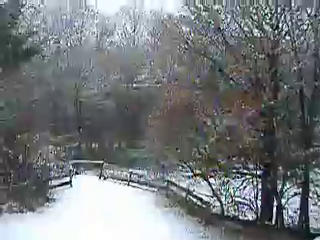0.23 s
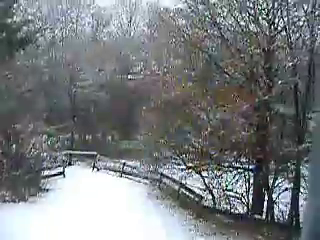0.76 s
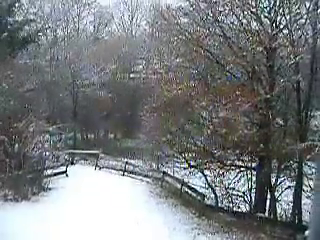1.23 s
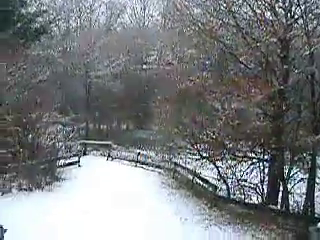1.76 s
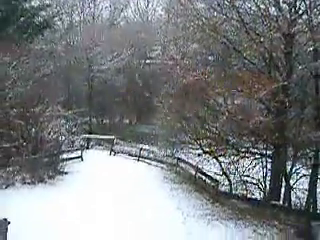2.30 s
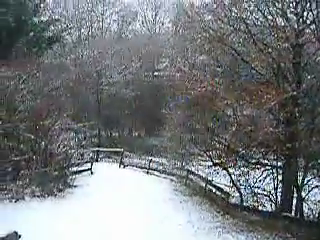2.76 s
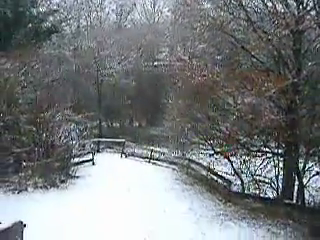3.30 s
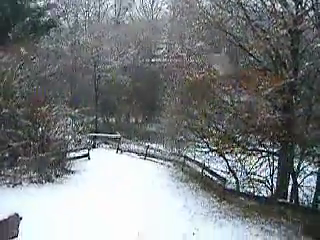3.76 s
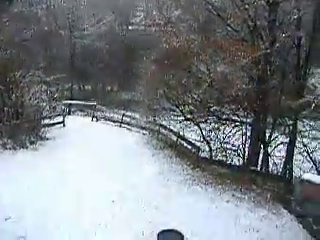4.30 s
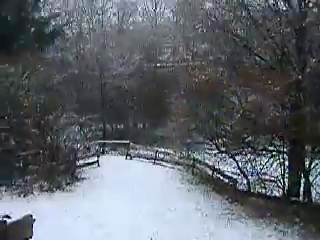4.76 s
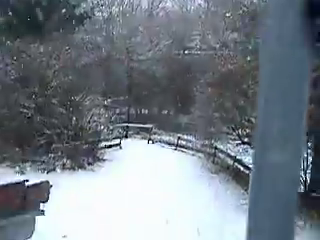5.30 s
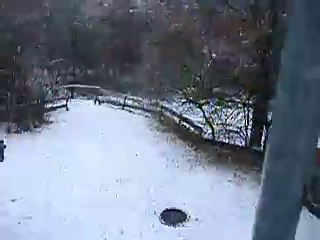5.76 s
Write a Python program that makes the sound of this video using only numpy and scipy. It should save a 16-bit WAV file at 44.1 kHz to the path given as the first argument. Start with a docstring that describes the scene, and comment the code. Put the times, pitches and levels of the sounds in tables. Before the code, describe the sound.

Hard clicks and hollow knocks of a hand on a small camera housing, some ringing metallically, over snowy outdoor hush, then dull footsteps thud on metal.

```python
"""A quiet, snowy garden with a metal spiral staircase, where someone handles a small camera.
Finger clicks and knocks excite the damped modes of the housing; rubs are stick-slip noise.
Near the end steps thud on the treads, as struck modes with grit and a boom of the frame.
Beneath lie shaped noise for the outdoor hush, a low rumble of faint wind that swells with air puffs
and step jolts, and faint steady high tones made of sines."""
import sys
import numpy as np
from scipy import signal
from scipy.fft import rfft, irfft
from scipy.io import wavfile
from scipy.ndimage import uniform_filter1d

SR = 44100
rng = np.random.default_rng(int(sys.argv[2]) if len(sys.argv) > 2 else 0)


def generate_wav(signal):
    """Clip the signal to [-1, 1] and save it as 16-bit WAV at the path in sys.argv[1]."""
    frames = np.transpose(np.atleast_2d(signal))
    scaled = np.clip(frames, -1, 1) * 32767
    pcm = np.round(scaled).astype(np.int16)
    wavfile.write(sys.argv[1], SR, pcm)


N = 266364
TIME = np.arange(N) / SR  # seconds from the start
AGE = np.arange(SR // 3) / SR  # seconds since a contact

# spectrum of the outdoor hush: (frequency [Hz], relative level [dB])
HUSH_SPECTRUM = [(20, -17.5), (45, 3), (90, -2.5), (150, -15), (220, -5.5), (350, -12.5), (520, -12),
                 (700, -11.5), (1100, -18), (1800, -19), (3000, -24), (6500, -23.5), (7900, -22.5),
                 (8400, -32)]
# spectrum of the low rumble: (frequency [Hz], relative level [dB])
RUMBLE_SPECTRUM = [(20, -0.5), (50, 0.5), (120, -4.5), (200, -11), (400, -26), (1000, -60)]
# swells of the rumble, air puffs at .8 and 4.1 s, step jolts to the camera at 5.05 and 5.75 s:
# (peak time [s], half-width to 1/e [s], level [dB])
RUMBLE_SWELLS = [(.8, 0.11, -38), (4.1, 0.31, -49), (5.05, 0.031, -39), (5.75, .08, -39)]
# faint steady high tones, two of them mirrored about 8 kHz: (frequency [Hz], rms level [dB])
HIGH_TONES = [(7424, -69.5), (7887, -64), (8113, -65.5)]
# steps on the treads: (time [s], thud level [dB], weight: gain of boom and grit against the thud [dB])
FOOTSTEPS = [(5.023, -31.5, -5.5), (5.1258, -30.5, 5), (5.1649, -27.5, -4), (5.5243, -25.5, -12.5),
             (5.547, -27.5, -13), (5.6964, -20.5, 0)]
# hollow modes of a tread: (frequency [Hz], relative level [dB], decay as a share of the thud's t60 [1])
TREAD_MODES = [(170.5, -5.5, 1.9), (321, -2, 1.23), (400, 5.5, 0.8), (480, 6, 0.84), (587, -16, 0.86),
               (854, -16, 1.5)]
# boom of the staircase frame: (frequency [Hz], relative level [dB], t60 [s])
FRAME_MODES = [(138.5, -9.5, 0.49), (192.7, -2, 0.24), (255, -4, 0.1), (314, -15, 0.2)]
# hand sliding softly on the housing: (time [s], level [dB])
SLIDE_LEVEL = [(0, -52.5), (1.2, -65.5), (3.4, -51.5), (4.4, -43.5), (4.8, -47), (6.04, -48.5)]
# spectrum of that slide: (frequency [Hz], relative level [dB])
SLIDE_SPECTRUM = [(150, -3), (450, -5.5), (700, -2), (1100, -9), (1900, -8), (2900, -20), (8000, -27)]
# finger rubs: (peak time [s], attack [s], release [s], level [dB], stickiness [dB])
RUB_STROKES = [(.08, 0.077, 0.057, -42.5, 4.5), (.296, 0.067, 0.0044, -37, -9),
               (.32, 0.017, 0.93, -45, 1.5), (.521, 0.036, 0.0073, -41, 16.5),
               (2.331, 0.032, 0.089, -29, 9.5), (2.718, 0.029, 0.062, -33.5, 2),
               (2.912, 0.15, 0.057, -39, -0.5), (2.96, 0.1, 0.37, -45, 5), (3.61, 0.018, .04, -39, 1.5),
               (3.828, 0.067, 0.057, -30, 3.5), (3.949, .02, .05, -42.5, 2),
               (5.313, 0.056, .067, -41.5, -2), (5.73, 0.08, .004, -37.5, -11),
               (5.909, .013, 0.028, -42, -3)]
# spectrum of the rasp of a rub: (frequency [Hz], relative level [dB])
RASP_SPECTRUM = [(200, -15.5), (400, -11), (550, -4), (670, -5), (820, -2.5), (980, -4.5), (1200, -19),
                 (1450, -14.5), (1700, -10.5), (2200, -11.5), (2550, -13), (3300, -21), (4500, -23),
                 (8000, -41)]
# spectrum of its treble fizz: (frequency [Hz], relative level [dB])
FIZZ_SPECTRUM = [(1000, -22.5), (2500, -7.5), (4000, -4), (6000, -2.5), (7300, 2.5), (8300, -4.5)]
# housing resonances that a scrape excites: (frequency [Hz], relative level [dB], t60 [s])
SQUEAL_MODES = [(1550, -13, .035), (1701, 4, 0.031), (1910, -9.5, 0.086), (3050, -12, .05),
                (3300, -25.5, .014)]
# ticks and pings of grit and small loose parts: (time [s], level [dB], pitch [Hz], t60 [s])
GRIT_TICKS = [(0.3164, -44, 3000, .1), (.453, -21, 3030, 0.015), (0.5077, -31.5, 1600, .08),
              (0.6415, -30.5, 2010, 0.011), (1.7764, -35.5, 1850, .016), (2.351, -31, 7240, 0.0066),
              (2.352, -27, 1724, 0.059), (2.549, -36, 2940, 0.06), (2.724, -38, 3120, 0.094),
              (4.5604, -40, 6800, 0.0046), (4.754, -47.5, 6840, 0.0065), (5.6691, -38.5, 2980, .003),
              (5.7286, -22.5, 7540, 0.0025), (5.729, -27.5, 794, 0.039)]
# light finger clicks: (time [s], strength [dB], hollowness [dB], hardness [dB])
FINGER_CLICKS = [(0.2413, -39, 1, -7), (0.2633, -35, 0.5, -21), (0.2876, -21, -1.5, -13),
                 (0.2949, -33.5, 8, -2), (0.3104, -28.5, -1, -26), (0.3399, -39.5, 8, -11),
                 (0.3583, -44.5, 8.5, -6), (0.453, -24, -3, -4), (0.4719, -29.5, 1, -8),
                 (0.5092, -41, -7, -22), (0.528, -41, 7.5, -22), (1.0057, -50.5, 9, -17),
                 (1.9963, -39.5, -2, 2), (2.3201, -22.5, -1, -4), (2.3514, -34.5, -7, -5),
                 (2.6971, -24.5, -0.5, -3), (2.776, -32.5, -1, -0.5), (2.7809, -34, -3, -2),
                 (2.7892, -39.5, -10, 3), (2.8519, -36.5, 0, -26), (3.2183, -41.5, 1, -8),
                 (3.4337, -43, -4, -21), (3.5927, -28.5, 1, -19), (3.6086, -34.5, -4, -19),
                 (3.6978, -48, -4, 2.5), (3.7327, -40.5, -0.5, -6), (3.8272, -33.5, 0, -1),
                 (3.848, -38, -3, 4.5), (3.8565, -24.5, -2, -4), (3.8869, -38, -2.5, -6.5),
                 (3.9417, -29, 0.5, 2.5)]
# knocks that ring the metal: (time [s], strength [dB], hollowness [dB], hardness [dB],
# ring setting against strength [dB], body pitch [Hz], body t60 [s])
HOUSING_KNOCKS = [(0.6813, -24, -0.5, -28, -4, 893, 0.035), (0.6976, -15.5, 0, -6.5, 1, 812, 0.071),
                  (1.5505, -21.5, -1, 2.5, -4, 797, 0.044), (1.807, -18, 0.5, -3.5, -7, 792, 0.048),
                  (2.403, -18, -2.5, -8.5, 4.5, 684, 0.11), (2.422, -25.5, 3, -12.5, -0.5, 750, 0.038),
                  (2.4383, -23.5, 0, -8.5, -7, 743, 0.048), (2.4563, -26.5, -.5, -7, 0, 750, .03),
                  (2.5089, -23, 3.5, -7, 1, 753, 0.036), (2.5419, -25.5, 3, -9.5, -7, 774, 0.036),
                  (2.5888, -29, 2, -21, -4.5, 747, 0.035), (3.12, -19.5, -7, -7.5, 6, 855, 0.11),
                  (3.6481, -17, 1.5, -15, 5.5, 767, 0.04)]
# modes of the hollow body: (ratio to body pitch [1], relative level [dB], decay as a share of body t60 [1])
BODY_MODES = [(.76, 1.5, 0.57), (.91, 8, 0.69), (1.05, 12.5, 0.9), (1.3, -11.5, 1)]
# nominal modes of the stiff shell, varied per contact: (frequency [Hz], relative level [dB], t60 [s])
SHELL_MODES = [(1238, -4.5, 0.017), (1655, -2.5, 0.033), (1725, 0.5, 0.015), (2077, -5.5, 0.023),
               (2570, -14.5, 0.013)]
# weaker modes of the metal, before detuning and weighting: (frequency [Hz], relative level [dB], t60 [s])
METAL_MODES = [(470, -15, 0.1), (654, -8, 0.055), (743, -6.5, 0.029), (886, -10, 0.088),
               (1203, -17.5, 0.12), (1777, -14.5, 0.085), (1949, -21, 0.13), (3030, -22.5, 0.072),
               (5200, -33, 0.1)]
# detuning of the metal by the changing hold: (time [s], pitch factor [1])
HOLD_DETUNING = [(.7, 1.018), (1.8, 1.02), (2.45, 0.99), (3.12, 1.0), (3.65, .988)]

HUSH_DB, BREEZE_DB = -46.5, -49.5  # hush and steady breeze
THUD_T60_S, GRIT_DB = 0.028, -4.5  # grit gain, before the weight of the step
SQUEAL_DB, FIZZ_DB = -8, -7.5  # against the rasp, at zero stickiness
FIZZ_PER_STICK = 1.58  # fizz lost per dB of stickiness [dB/dB]
SNAP_DB, TICK_DB = 0.5, 2  # treble parts of a contact, against strength + hardness
TICK_PER_HARD = 0.23  # extra gain of the top part per dB of hardness [dB/dB]
CLICK_HZ, CLICK_RING_DB, CLICK_T60_S = 774, -16.5, .029  # mid pitch, ring setting and body t60 of a click
METAL_HZ, METAL_T60_S = 528, .175  # main mode of the metal, before detuning
MIC_EDGE_HZ, EDGE_HZ = 8450, 16100  # low-pass edges before and after the clipping


def amp(db):
    """Level to amplitude: 20 dB is a factor of ten."""
    return 10 ** (np.asarray(db) / 20)


def evened(x, size=None):
    """Normalisation to unit rms, taken over the first samples only if a size is given."""
    return x / np.sqrt(np.mean(x[:size] ** 2) + 1e-20)


def add(mix, s, sound):
    """Superposition: a sound starting at s seconds is summed into the mix."""
    part = mix[round(s * SR):][:len(sound)]
    part += sound[:len(part)]


def coloured(x, points):
    """Spectral shaping: x is weighted along a curve through (Hz, dB) points, at unit rms."""
    curve_hz, curve_db = np.transpose(points)
    hz = np.fft.rfftfreq(len(x), 1 / SR)
    gain = amp(np.interp(np.log(hz + 1), np.log(curve_hz), curve_db))
    return evened(irfft(rfft(x) * gain, len(x)))


def band(x, lo_hz, hi_hz):
    """Band-pass filtering between two corner frequencies."""
    return signal.sosfilt(signal.butter(2, [lo_hz, hi_hz], "band", fs=SR, output="sos"), x)


def decay(t60):
    """Exponential damping: the amplitude falls by 60 dB in t60 seconds."""
    return np.exp(-np.log(1000) * AGE / max(t60, 1e-3))


def buildup(time_s):
    """Gradual energy transfer: the amplitude approaches one with this time constant."""
    return 1 - np.exp(-AGE / time_s)


def mode(hz, t60):
    """Free damped vibration: one struck resonance is a decaying sine."""
    return np.sin(2 * np.pi * hz * AGE) * decay(t60)


def struck(modes):
    """Modal superposition: (Hz, dB, t60) resonances are struck together."""
    return sum(amp(db) * mode(hz, t60) for hz, db, t60 in modes)


def crack(lo_hz, hi_hz, t60, scatter):
    """Impulsive contact: one sharp impulse and the decaying scatter of tiny contacts after it."""
    burst = scatter * rng.standard_normal(len(AGE)) * decay(t60)
    burst[0] += 1
    return evened(band(burst, lo_hz, hi_hz), size=220)


def grainy(spread_db):
    """Stick-slip friction: noise whose strength wanders on a scale of about a millisecond."""
    slips = evened(uniform_filter1d(rng.standard_normal(N), size=50))
    return rng.standard_normal(N) * amp(spread_db * np.clip(slips, -2, 2))


def hush():
    """Stationary ambience: steady noise with the spectrum of the outdoor hush."""
    return amp(HUSH_DB) * coloured(rng.standard_normal(N), HUSH_SPECTRUM)


def low_rumble():
    """Amplitude modulation: low noise, steady for the breeze, swells with air puffs and step jolts."""
    strength = np.full(N, amp(BREEZE_DB))
    for s, width, db in RUMBLE_SWELLS:
        strength += amp(db) * np.exp(-((TIME - s) / width) ** 2)
    return strength * coloured(rng.standard_normal(N), RUMBLE_SPECTRUM)


def high_tones():
    """Steady oscillation: faint high sine tones in arbitrary phase."""
    out = np.zeros(N)
    for hz, db in HIGH_TONES:
        cycles = hz * TIME + rng.random()
        out += amp(db) * np.sqrt(2) * np.sin(2 * np.pi * cycles)
    return out


def steps():
    """Impact of a soft sole on a tread: with more weight the grit grinds and the frame booms more."""
    out = np.zeros(N)
    tread = struck([(hz, db, THUD_T60_S * share) for hz, db, share in TREAD_MODES])
    # the sole presses for a few milliseconds, which keeps the thud dull
    press = 1 - np.exp(-(AGE / 0.0025) ** 2)
    thud = evened(tread * press, size=530)
    for s, thud_db, weight_db in FOOTSTEPS:
        # the many weak modes of the frame blur into a faint rumble
        rumble = amp(-6) * crack(149, 347, t60=0.24, scatter=0.43)
        boom = (struck(FRAME_MODES) + rumble) * buildup(0.0031)
        grit = amp(GRIT_DB) * crack(920, 2320, t60=0.079, scatter=.8) * press
        # the boom starts in the opposite sense
        add(out, s, amp(thud_db) * (thud + amp(weight_db) * (grit - boom)))
    return band(out, 110, 3800)


def slide():
    """Light sliding friction: the hand on the housing gives soft grainy noise of varying level."""
    level_db = np.interp(TIME, *np.transpose(SLIDE_LEVEL))
    return amp(level_db) * coloured(grainy(spread_db=2.0), SLIDE_SPECTRUM)


def rubs():
    """Stick-slip strokes rasp, ring the housing and fizz; a sticky finger squeals more and fizzes less."""
    rasp, squeal, fizz = np.zeros((3, N))
    for top, attack, release, db, stick_db in RUB_STROKES:
        stroke = amp(db) * np.interp(TIME, [top - attack, top, top + release], [0, 1, 0])
        rasp += stroke
        squeal += amp(SQUEAL_DB + stick_db) * stroke
        fizz += amp(FIZZ_DB - FIZZ_PER_STICK * stick_db) * stroke
    rasp *= coloured(grainy(spread_db=3.5), RASP_SPECTRUM)
    squeal *= evened(signal.oaconvolve(grainy(spread_db=8), struck(SQUEAL_MODES))[:N])
    fizz *= coloured(grainy(spread_db=6.5), FIZZ_SPECTRUM)
    return rasp + squeal + fizz


def ticks():
    """Small-body impact: grit and loose parts sound one damped mode with a faint crack."""
    out = np.zeros(N)
    for s, db, hz, t60 in GRIT_TICKS:
        ping = evened(mode(hz, t60), size=220)
        scrape = amp(-9.5) * crack(1300, 7400, t60=0.011, scatter=0.71)
        add(out, s, amp(db) * evened(ping + scrape, size=220))
    return out


def metal_ring(s, db, clack_db):
    """Modal excitation of the metal: soft knocks favour its main mode, sharp ones its high modes."""
    detune = np.interp(s, *np.transpose(HOLD_DETUNING))
    softness_db = 0.24 * min(db + 12.5, 0)
    sharpness_db = 1.2 * min(clack_db - db, 12)
    others = np.zeros(len(AGE))
    for hz, level_db, t60 in METAL_MODES:
        # every knock lands elsewhere and so weights the modes differently
        place_db = np.clip(3.9 * rng.standard_normal(), -3, 3)
        treble_db = sharpness_db * (hz * detune > 1500)
        others += amp(level_db + treble_db + place_db) * mode(hz * detune, t60)
    blur = amp(-23.0) * crack(600, 3900, t60=0.041, scatter=.6)
    upper = amp(softness_db) * (others + blur) * buildup(0.0022)
    # energy takes some milliseconds to pass into the main mode
    main = mode(METAL_HZ * detune, METAL_T60_S) * buildup(0.019)
    return amp(db + 5.0) * (main + upper)


def hollow_body(hz, t60):
    """Beating of neighbouring modes: they start in opposite senses, so the knock swells and beats."""
    body = np.zeros(len(AGE))
    for k, (ratio, level_db, share) in enumerate(BODY_MODES):
        body += (-1) ** k * amp(level_db) * mode(hz * ratio, t60 * share)
    # the freer the body is to ring, the later it reaches its peak
    rise_s = np.clip(0.36 * (t60 - .025), 1e-4, .006)
    return evened(body * buildup(rise_s), size=530)


def shell_clack():
    """Point excitation of a stiff shell: the place of contact changes the mix of its modes."""
    shell = np.zeros(len(AGE))
    for hz, level_db, t60 in SHELL_MODES:
        gain = amp(level_db + 3.6 * rng.standard_normal()) * rng.choice([-1, 1])
        shell += gain * mode(hz * rng.uniform(0.948, 1.03), t60)
    noise = amp(-0.5) * crack(934, 2390, t60=0.012, scatter=0.12)
    return evened(evened(shell, size=260) + noise, size=260)


def contact(s, db, hollow_db, hard_db, ring_db, hz, t60):
    """Impact on a housing: a hollow spot favours body over shell, and a hard touch adds treble."""
    body_db, clack_db, treble_db = db + hollow_db, db - hollow_db, db + hard_db
    body = amp(body_db) * hollow_body(hz, t60)
    clack = amp(clack_db) * shell_clack()
    ring = metal_ring(s, db + ring_db, clack_db)
    push = amp(body_db - 11) * crack(100, 820, t60=0.05, scatter=0.06)
    snap = amp(treble_db + SNAP_DB) * crack(2330, 4610, t60=0.016, scatter=0.1)
    tick_db = treble_db + TICK_DB + TICK_PER_HARD * hard_db
    tick = amp(tick_db) * crack(4150, 8160, t60=0.0075, scatter=0.34)
    return body + clack + ring + push + snap + tick


def clicks():
    """Light impact: finger clicks excite the housing, at a body pitch that varies from click to click."""
    out = np.zeros(N)
    for s, *touch in FINGER_CLICKS:
        hz = CLICK_HZ * (1 + rng.uniform(-0.0588, 0.049))
        add(out, s, contact(s, *touch, CLICK_RING_DB, hz, CLICK_T60_S))
    return out


def knocks():
    """Strong impact: each knock excites the housing hard enough to ring the metal."""
    out = np.zeros(N)
    for s, *blow in HOUSING_KNOCKS:
        add(out, s, contact(s, *blow))
    return out


def scene():
    """Superposition of the quiet garden, the steps and the handling noises, in mono."""
    background = hush() + low_rumble() + high_tones()
    handling = slide() + rubs() + ticks() + clicks() + knocks()
    return (background + steps() + handling)[None]


def record(dry):
    """Band limiting and overload: a narrow-band recorder clips its hardest peaks, then is low-passed."""
    mic_filter = signal.firwin(141, MIC_EDGE_HZ, window=("kaiser", 8), fs=SR)
    narrow = signal.oaconvolve(dry, mic_filter[None], "same")
    clipped = np.clip(narrow, -.72, .72)
    edge_filter = signal.firwin(511, EDGE_HZ, window=("kaiser", 9), fs=SR)
    return signal.oaconvolve(clipped, edge_filter[None], "same")


dry = scene()
out = record(dry)
generate_wav(out)
```